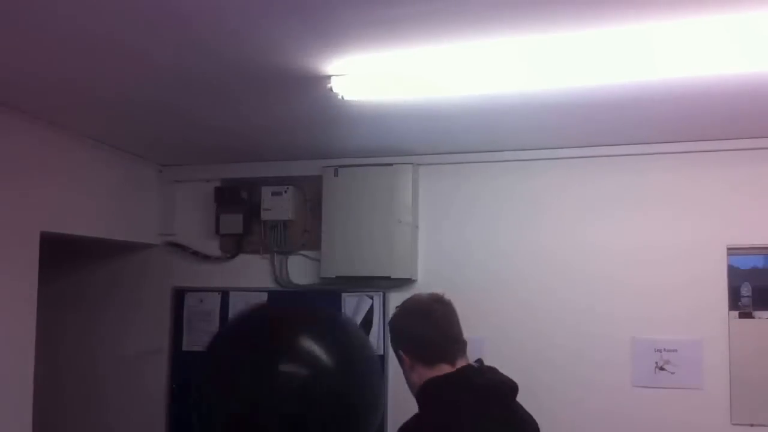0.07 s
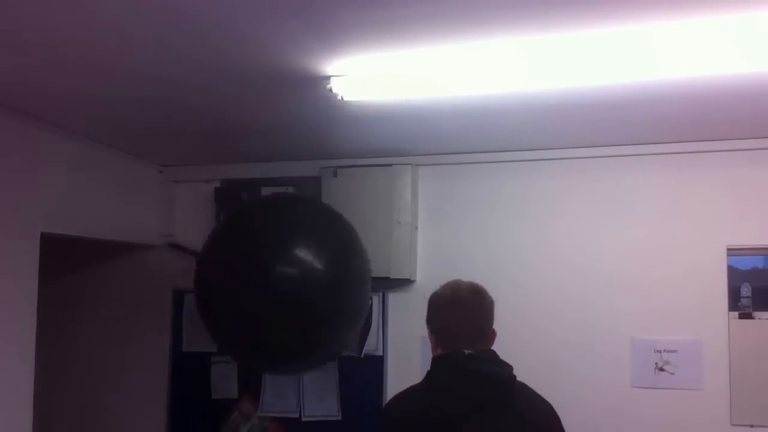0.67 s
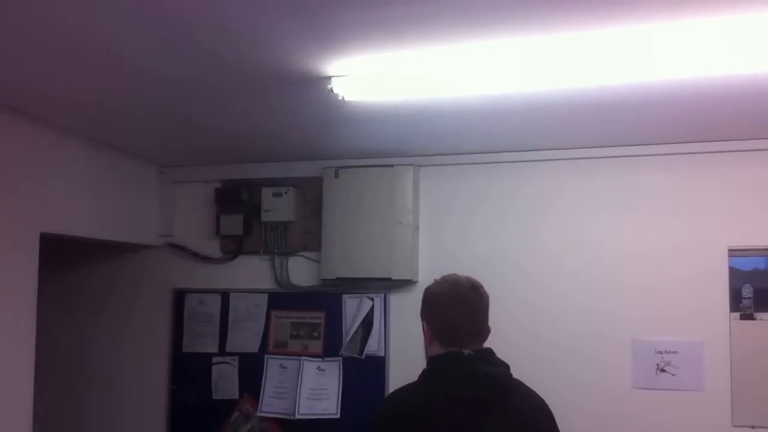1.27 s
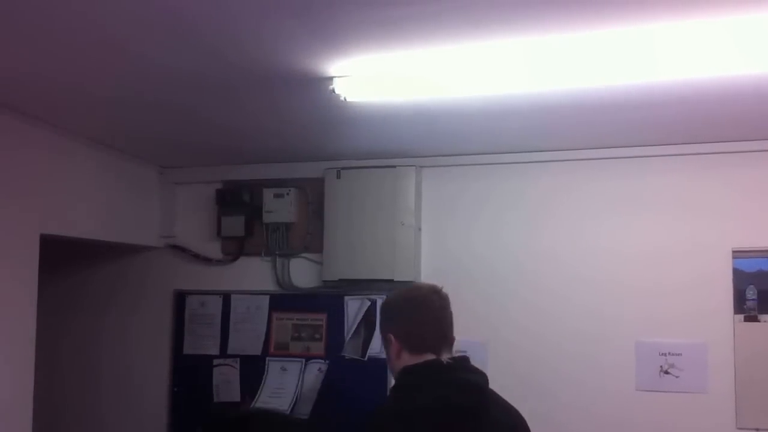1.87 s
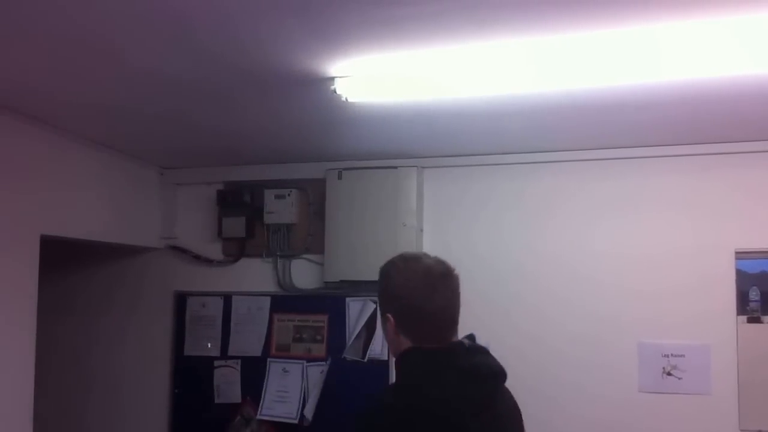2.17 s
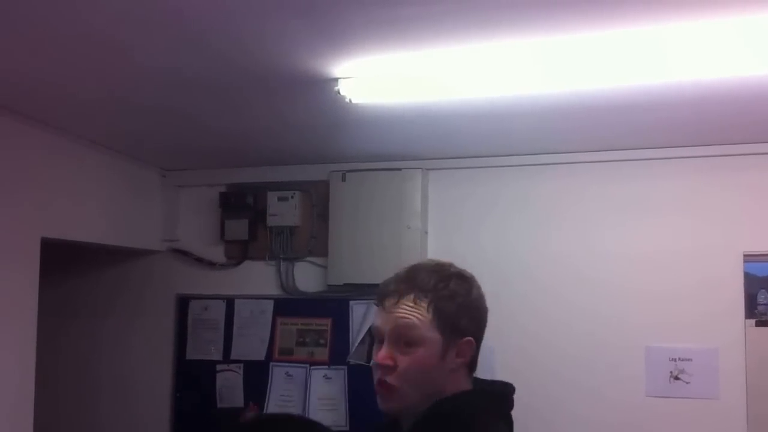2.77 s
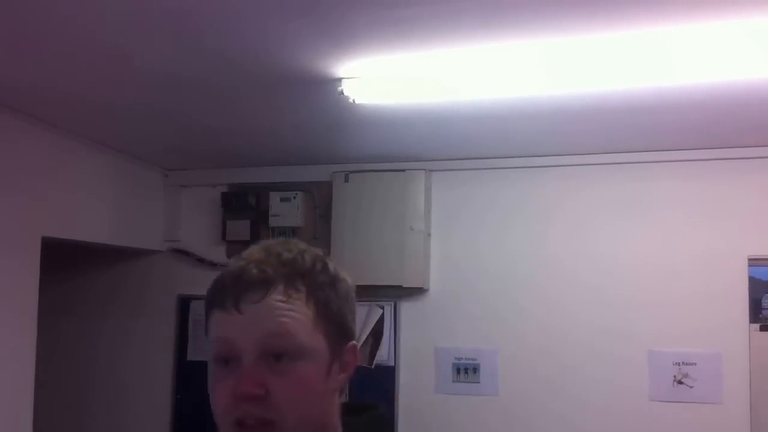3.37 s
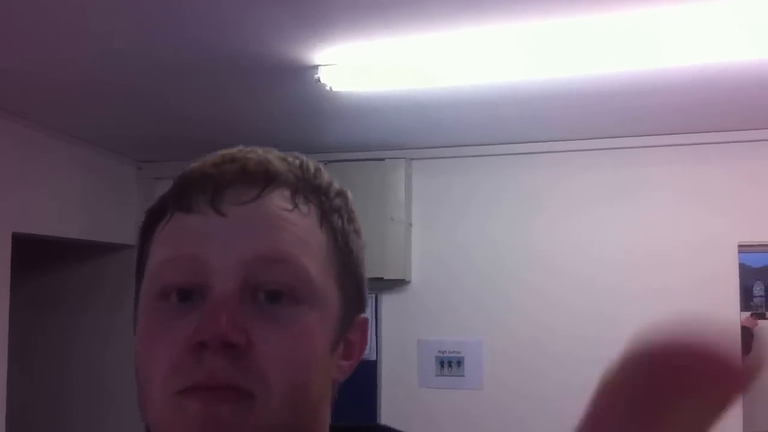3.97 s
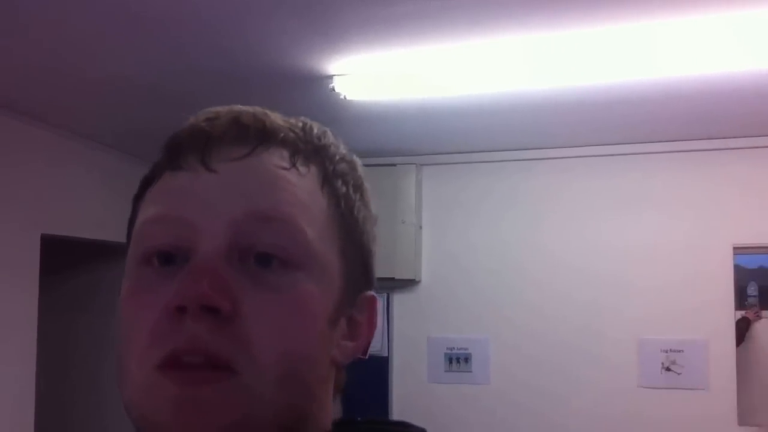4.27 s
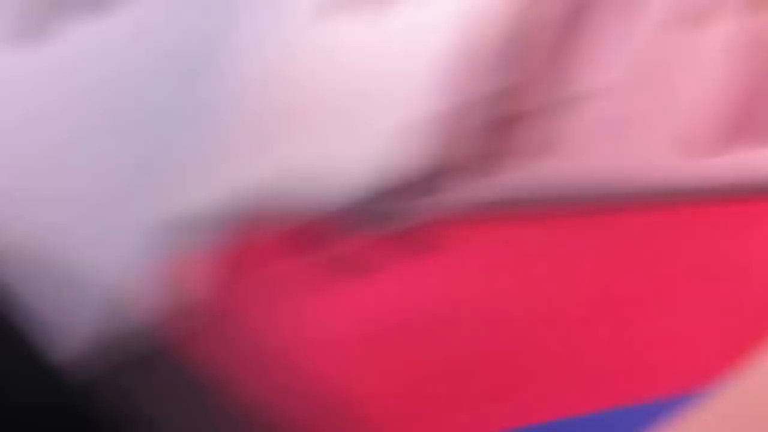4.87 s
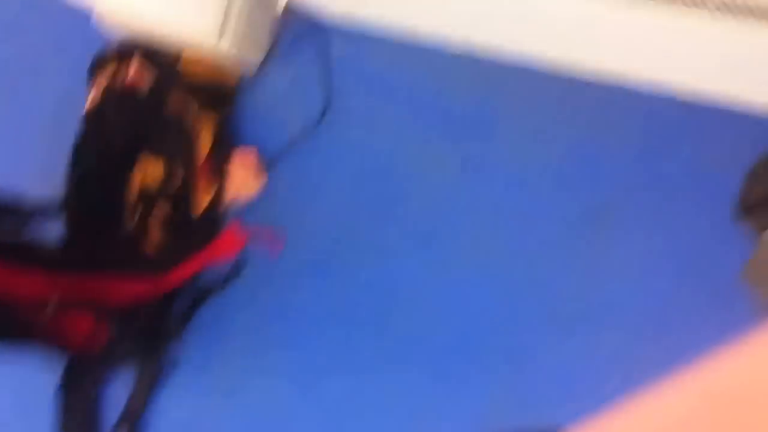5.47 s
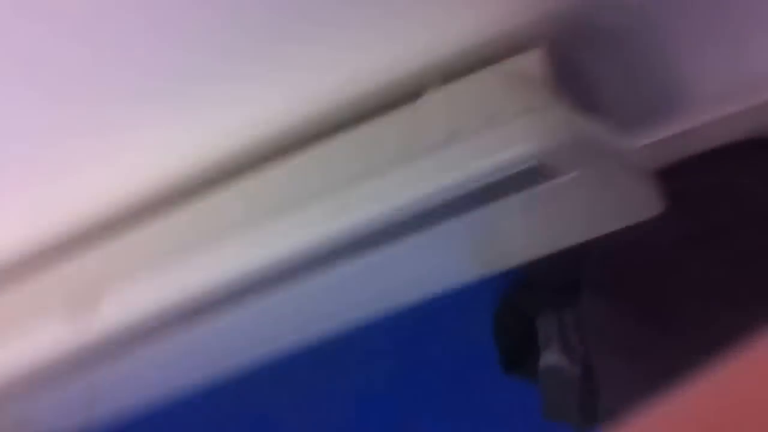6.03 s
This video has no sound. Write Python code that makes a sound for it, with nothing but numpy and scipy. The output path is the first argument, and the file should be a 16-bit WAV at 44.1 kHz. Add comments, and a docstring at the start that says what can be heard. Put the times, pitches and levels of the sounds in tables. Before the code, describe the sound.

A large air-filled exercise ball thumps down and crashes loudly into metal wall fittings, which ring and rattle for about a second while papers flutter. The ball bounces six more times, the hops growing shorter and softer, each with a hollow ping and a low boom from the small, hard-walled gym. Faint steps, scuffs and rubbing clothes come between the later bounces, over a quiet hiss.

```python
"""A deep rubber thump, then a crash of sheet metal: a big air-filled exercise ball is driven into the
wall fittings of a small, hard-walled gym. The panel rings, loose metal rattles and pinned papers flutter.
The ball bounces on, each hop a little shorter, the air inside it pinging and the room booming,
while someone shuffles across the floor with soft steps and rubbing clothes over a quiet hiss."""
import sys
import numpy as np
from scipy import signal
from scipy.io import wavfile

SR = 44100
rng = np.random.default_rng(int(sys.argv[2]) if len(sys.argv) > 2 else 0)


def master(y):
    """Save y as 16-bit WAV."""
    cut = np.clip(np.atleast_2d(y).T, -1, 1)
    pcm = np.round(cut * 32767)  # scale
    wavfile.write(sys.argv[1], SR, pcm.astype(np.int16))


N = 269539
TIME = np.arange(N) / SR

# blows on the fittings, the last row a light clatter as the ball lands on the floor; all table levels are
# relative, ahead of the mix gains (time [s], level [dB], rise [s], clatter t60 [s], tilt [dB/octave], bass push
# [dB], ring [dB])
BLOWS = [(.039, -24, 0.0019, 0.15, 2, 0, -19), (.254, -7.5, 0.013, 0.22, 0.1, -12, -4.5),
         (.352, -3.5, 0.0063, 0.16, 0.5, -2, -5.5), (0.375, -7.5, 0.0056, 0.14, -4, -16.5, -5.5),
         (.432, -15.5, 0.0035, 0.3, -6.5, -8, -3), (.553, -19, .005, 0.13, 0.5, -13.5, -10),
         (0.674, -23, 0.00677, 0.29, -4, -1.5, -5), (1.041, -12.5, 0.0097, 0.16, -2.5, -8.5, 2.5),
         (1.074, -20, 0.0077, 0.14, -3, -15, -1), (1.262, -26, 0.0013, 0.069, -6, 8, -27)]
# tone of rubber clattering on metal (frequency [Hz], level [dB])
CLATTER_EQ = [(90, -31), (180, -7), (400, -4), (740, 1), (1100, -3.5), (1450, 3), (1950, -6), (2500, -13.5),
              (3900, -15.5), (5200, -22), (7000, -26), (11000, -34), (15500, -33.5)]
# tone of the ball's low shove (frequency [Hz], level [dB])
PUSH_EQ = [(35, -27), (75, -29.5), (125, 0.5), (190, -5.5), (280, -1), (500, -10), (2000, -59.5)]
# tone of the loose metal's chatter (frequency [Hz], level [dB])
CHATTER_EQ = [(90, -38), (160, -4), (300, -6.5), (450, 3), (740, 0.5), (1050, -4), (1450, 4), (1900, -7.5),
              (2500, -22), (4000, -24.5), (7000, -40), (12000, -55)]
# ring of the sheet metal (frequency [Hz], level [dB], t60 [s])
PANEL_MODES = [(410, 3.5, 0.36), (498, 5, 0.76), (663.5, 0.5, 0.82), (714, 5.5, 0.3), (772, 7.5, 0.1),
               (935, -13, 0.66), (1060, -15, 0.18), (1343, 0, 0.14), (1455, -2.5, 0.25), (1680, -7, 0.18),
               (2114, 3.5, 0.12), (2170, -0.5, 0.25), (3020, -11.5, .35), (4028, -19, .2)]
# ping of the air inside the ball, in crashes and bounces (frequency [Hz], level [dB], t60 [s])
BALL_MODES = [(367.3, 10, 0.051), (421, 0.5, 0.26), (547, -10, 0.12), (800, -4.5, 0.062), (960, -21.5, .08)]
def crashes():
    """Each blow is a dense clatter of contacts and one knock that rings the panel and the ball's air."""
    clatter, knocks, push = np.zeros((3, N))
    for s, db, rise, t60, tilt_db, bass_db, ring_db in BLOWS:
        force = amp(db) * swell(rise, t60)
        click = colour(CLATTER_EQ, tilt_db)
        add(clatter, s, through(force * grains(9000, 0.34, len(force)), click))
        add(knocks, s + rise / 2, amp(ring_db) * np.linalg.norm(force) * click)
        add(push, s, amp(bass_db) * through(force * grains(3000, 0.88, len(force)), colour(PUSH_EQ)))
    chatter = rattle_envelope() * through(grains(550, 1.6), colour(CHATTER_EQ))
    panel = amp(-12) * through(knocks + amp(-4) * chatter, ring(PANEL_MODES))
    ping = amp(-15.5) * through(knocks, ring(BALL_MODES))
    metal = amp(1) * (clatter + chatter) + panel
    reverb = room(metal + amp(-6.5) * push, build_s=0.0027)
    return amp(-2) * (metal + push + ping) + amp(-4.5) * reverb


# bouts of chatter in the loose metal (time [s], level [dB], hold [s])
RATTLE_BOUTS = [(0, -35, .2), (0.355, -14, 0.73)]
def rattle_envelope():
    """How hard the loose metal chatters: a flare that settles to a steady rattle, then dies away."""
    out = np.zeros(N)
    flare = held(rise_s=0.03, hold_s=0, t60=0.9)
    for s, db, hold_s in RATTLE_BOUTS:
        steady = amp(-15) * held(rise_s=0.03, hold_s=hold_s, t60=0.53)
        add(out, s, amp(db) * np.maximum(flare, steady))
    return out


# the ball landing (time [s], thump [dB], ping [dB], smack [dB], skin sizzle [dB], room boom [dB])
LANDINGS = [(0, 2.5, -10, -23, -22, 10.5), (1.262, 3.5, -13, -1.5, -18.5, 3.5),
            (2.206, -0.5, -4.5, -7, -30, -1), (3.115, -1.5, -11, -7, -28, 2.5),
            (3.96, 0.5, 1.5, -9.5, -26, -1.5), (4.742, -4, 1, -22, -21, -4),
            (5.472, -4, -10, -17, -33, -2.5)]
# body of a floor hit, for ball and heels (frequency [Hz], level [dB])
THUMP_EQ = [(35, -22.5), (70, -21.5), (100, -15.5), (160, 6.5), (270, -8), (380, 9.5), (600, 1), (1000, -5),
            (1400, -14.5), (2500, -31), (8000, -54)]
# midrange smack of the skin (frequency [Hz], level [dB])
SMACK_EQ = [(200, -22.5), (550, -3.5), (900, -1.5), (1400, -1.5), (2100, -9.5), (2600, -19), (3600, -21),
            (7000, -42), (14000, -56.5)]
# bright sizzle of the skin (frequency [Hz], level [dB])
SIZZLE_EQ = [(800, -19.5), (2500, 10), (4000, 0.5), (6500, -5), (8500, -12.5), (12000, -24.5), (15500, -29)]
# direct sound and early reflections off the near walls (delay [s], gain [linear])
EARLY_PATHS = [(0, 0.35), (.0034, 0.4), (.006, 0.24), (0.0105, 0.27)]
# standing waves of the room (frequency [Hz], level [dB], t60 [s])
BOOM_MODES = [(76, -9.5, 0.95), (131.6, 1, 0.56), (157.8, 0, 1.5), (165.3, -3, 1.2), (192.5, -1.5, 1.4),
              (209, -2, 2.3), (249, -1.5, 0.88), (349, -1, 1.4), (369.7, -4.5, 3.2)]
def bounces():
    """The ball thumps and pings while its skin smacks flat; near walls answer, then the room booms."""
    out, walls = np.zeros(N), np.zeros(SR // 4)
    for delay, gain in EARLY_PATHS:
        add(walls, delay, np.array([gain]))
    boom = build_up(ring(BOOM_MODES), build_s=0.041)  # standing waves take time to grow
    for s, thump_db, ping_db, smack_db, sizzle_db, boom_db in LANDINGS:
        hit = amp(ping_db) * ring(BALL_MODES)
        send = amp(-6.5) * hit  # the far walls get less ping
        for path in (hit, send):
            add(path, 0, amp(thump_db) * colour(THUMP_EQ))
        for db, eq, t60 in [(smack_db, SMACK_EQ, 0.016), (sizzle_db, SIZZLE_EQ, 0.07)]:
            contact = swell(rise_s=0.0004, t60=t60)
            skin = through(contact * grains(9000, 0.21, len(contact)), colour(eq))
            add(hit, 0, amp(db) * unit(skin))
            add(send, 0, amp(db) * colour(eq))  # same tone with the grain smoothed out
        near = amp(-0.5) * through(hit, unit(walls))
        far = amp(1.5) * through(send, tail(build_s=0.0016))
        add(out, s, near + far + amp(boom_db) * boom)
    return out


# soft footfalls and bumps (time [s], level [dB], pitch [Hz], t60 [s])
FOOTFALLS = [(3.178, -30.5, 191, 0.081), (3.781, -28, 348, 0.11), (4.407, -46, 964, 0.064),
             (4.654, -38, 226, 0.029)]
def footfalls():
    """Short damped thuds of heels on the matting, each with a dull tap."""
    out = np.zeros(N)
    for s, db, hz, t60 in FOOTFALLS:
        force = swell(rise_s=0.0057, t60=t60)
        thud = np.sin(2 * np.pi * hz * TIME[:len(force)])
        tap = amp(-4) * through(grains(3600, 0.97, len(force)), colour(THUMP_EQ))
        add(out, s, amp(db) * force / force.max() * (thud + tap))
    return amp(-1.5) * out + amp(-13.5) * through(out, tail(build_s=0.008))


# swings of the pinned papers (time [s], level [dB], t60 [s])
PAPER_FLAPS = [(.997, -30, 0.6), (1.2, -35, 0.72), (1.41, -39, 0.7), (2.03, -51.5, 0.34)]
# crisp tone of paper (frequency [Hz], level [dB])
PAPER_EQ = [(400, -7), (1200, 11.5), (2200, 6.5), (3300, -4), (4300, -5.5), (5200, -3.5), (6300, -14.5),
            (11000, -25), (15500, -27)]
def papers():
    """Papers flap on the board: each swing is a burst of coarse snaps that dies away."""
    flutter = np.zeros(N)
    for s, db, t60 in PAPER_FLAPS:
        add(flutter, s, amp(db) * held(rise_s=0.014, hold_s=0.014, t60=t60))
    return flutter * through(grains(2000, 1.9), colour(PAPER_EQ))


# scuffs of shoes and sleeves, then two faint handling bumps on the microphone
# (time [s], level [dB], length [s])
SCUFFS_AND_BUMPS = [(2.007, -46.5, 0.17), (2.645, -44, 0.12), (2.713, -42, .12), (2.844, -45, 0.076),
                    (2.926, -40.5, 0.073), (3.044, -48, 0.13), (3.216, -35, 0.11), (3.55, -43, 0.089),
                    (3.617, -40.5, 0.2), (3.8, -41, 0.16), (5.224, -49.5, .06), (5.837, -47.5, 0.07)]
# clothes rubbing as the person moves (time [s], level [dB], hold [s])
CLOTH_RUBS = [(2.637, -53, 1.47), (3.94, -58.5, 0.66), (5.794, -55.5, 0.11)]
# muffled tone of the friction (frequency [Hz], level [dB])
SCUFF_EQ = [(100, -21.5), (250, -1.5), (420, 8), (680, 4), (1200, -3), (2100, -8), (3000, -16.5),
            (5000, -30), (9000, -45.5), (15000, -58)]
def scuffs():
    """Fine friction grains: each touch swells quickly and eases off, over the steady rub of clothes."""
    touches, clothes = np.zeros((2, N))
    skew, sharpness = 0.56, 1.15
    for s, db, length in SCUFFS_AND_BUMPS:
        progress = TIME[TIME < length] / length
        add(touches, s, amp(db) * np.sin(np.pi * progress ** skew) ** sharpness)
    for s, db, hold_s in CLOTH_RUBS:
        add(clothes, s, amp(db) * held(rise_s=0.022, hold_s=hold_s, t60=0.18))
    return np.hypot(touches, clothes) * through(grains(3000, 1), colour(SCUFF_EQ))


# reverb time of the hard-walled gym (frequency [Hz], t60 [s])
REVERB_TIMES = [(60, 1), (160, 2.8), (420, 0.66), (1100, 1.65), (2900, 1.036), (7700, 0.88), (15000, 0.66)]
def tail(build_s):
    """Diffuse room echo: builds up, then each band dies at its own speed."""
    hz, t, bands = signal.stft(grains(6000, 0.99, 2 * SR), SR, nperseg=256)
    decay = 1000 ** (-t / read(REVERB_TIMES, hz)[:, None])
    echo = signal.istft(bands * decay, SR, nperseg=256)[1][:2 * SR]
    return build_up(echo, build_s)


def room(x, build_s, count=3):
    """Smooth, diffuse room echo: the sound feeds several tails in turn, so no pitch sticks out."""
    turn = 2 * np.pi * 13 * TIME
    sends = (x * np.cos(turn + np.pi * k / count) for k in range(count))
    return np.sqrt(2 / count) * sum(through(send, tail(build_s)) for send in sends)


# tone of the background hiss (frequency [Hz], level [dB])
HISS_EQ = [(30, 12.5), (90, -0.5), (160, 26), (400, 31), (1000, 5), (3000, 12.5), (8000, 5.5), (15500, 3.5)]
def hiss():
    """A quiet, steady bed of noise, fullest in the low mids."""
    return amp(-63) * through(rng.standard_normal(N), colour(HISS_EQ))


def amp(db):
    """Decibels to linear gain."""
    return 10 ** (np.asarray(db) / 20)


def unit(x):
    """Scales to an energy of one."""
    return x / np.sqrt(np.sum(x ** 2) + 1e-20)


def read(points, hz):
    """Reads a curve on a log-frequency axis."""
    f, value = np.transpose(points)
    return np.interp(np.log(hz + 1), np.log(f + 1), value)


def add(mix, s, sound):
    """Mixes a sound in at time s."""
    part = mix[max(round(s * SR), 0):][:len(sound)]
    part += sound[:len(part)]


def through(x, response):
    """Plays x through an impulse response."""
    return signal.fftconvolve(x, response)[:len(x)]


def colour(eq, tilt_db=0, size=4096):
    """Causal click of unit energy with the given tone, tilted by tilt_db per octave about 1 kHz."""
    hz = abs(np.fft.fftfreq(size, 1 / SR))
    octaves = np.log2(np.maximum(hz, 250) / 1000)
    log_gain = np.log(amp(read(eq, hz) + tilt_db * octaves))
    minimum_phase = np.exp(np.conj(signal.hilbert(log_gain)))
    return unit(np.fft.ifft(minimum_phase).real[:size // 2])


def ring(modes):
    """Decaying sines of unit total energy; neighbouring modes swing in opposite directions."""
    t = TIME[:2 * SR]
    return unit(sum((-1) ** k * amp(db) * unit(1000 ** (-t / t60) * np.sin(2 * np.pi * hz * t))
                    for k, (hz, db, t60) in enumerate(modes)))


def grains(per_s, spread_db, size=N):
    """Random clicks of uneven strength, rms one."""
    strength = amp(spread_db * np.minimum(rng.exponential(1, size), 3)) * rng.choice([-1, 1], size)
    return unit(strength * (rng.random(size) < per_s / SR)) * np.sqrt(size)


def swell(rise_s, t60):
    """Force of one contact: a short rise and an exponential fall."""
    t = TIME[:SR // 2]
    return np.minimum(t / rise_s, 1) * 1000 ** (-t / t60)


def held(rise_s, hold_s, t60):
    """Envelope of attack, hold and exponential release."""
    return np.minimum(TIME / rise_s, 1) * 1000 ** (-np.maximum(TIME - hold_s, 0) / t60)


def build_up(x, build_s):
    """Fades x in and scales it to unit energy."""
    return unit(x * (1 - np.exp(-TIME[:len(x)] / build_s)))


def scene():
    """Mono mix: impacts up front, rustles with their reverb behind, hiss underneath."""
    bed = hiss()
    impacts = crashes() + bounces() + footfalls()
    rustle = scuffs() + papers()
    return (impacts + amp(-1.5) * rustle + amp(-7) * room(rustle, build_s=0.038) + bed)[None]


def record(dry):
    """A small microphone sheds the deep bass, rounds the loudest peaks and limits the band."""
    thin = signal.sosfilt(signal.butter(4, 52, "highpass", fs=SR, output="sos"), dry)
    rounded = thin / (1 + thin ** 4) ** (1 / 4)
    lowpass = signal.firwin(511, 15750, window=("kaiser", 9), fs=SR)
    return signal.oaconvolve(rounded, lowpass[None], "same")


dry = scene()
out = record(dry)
master(out)
```